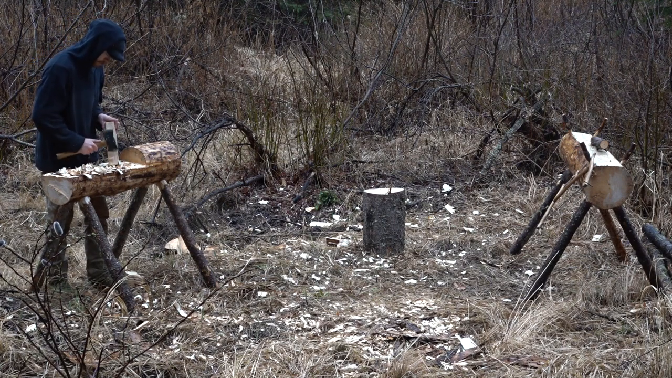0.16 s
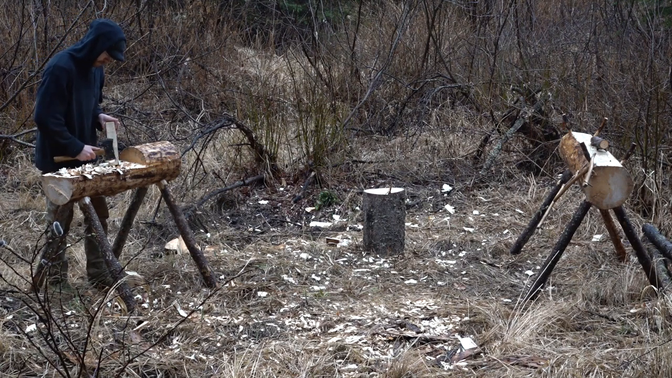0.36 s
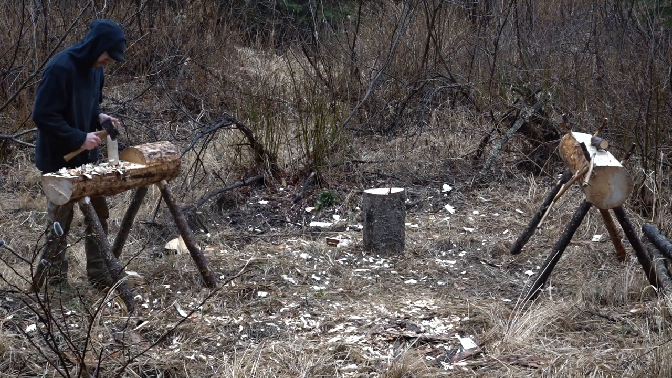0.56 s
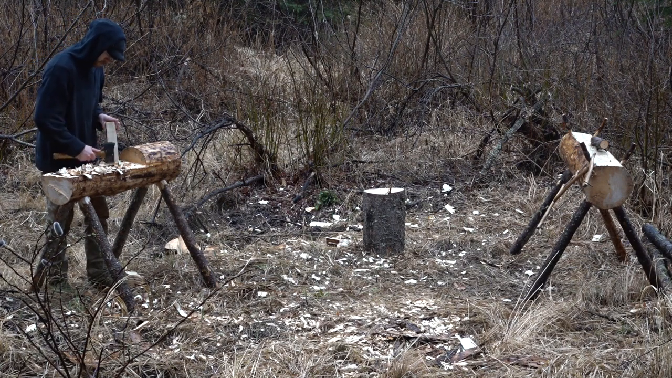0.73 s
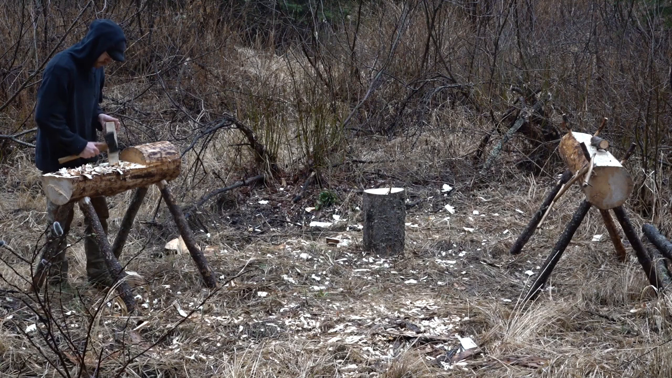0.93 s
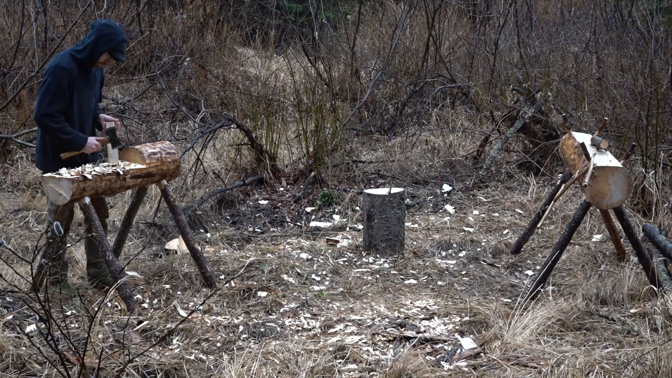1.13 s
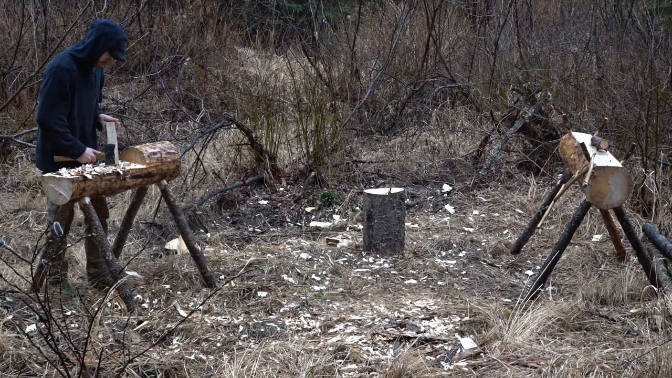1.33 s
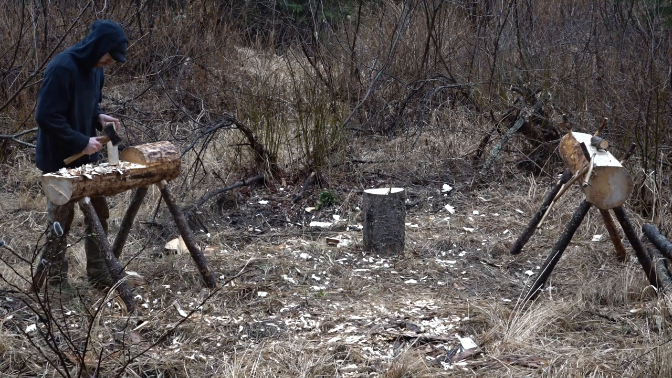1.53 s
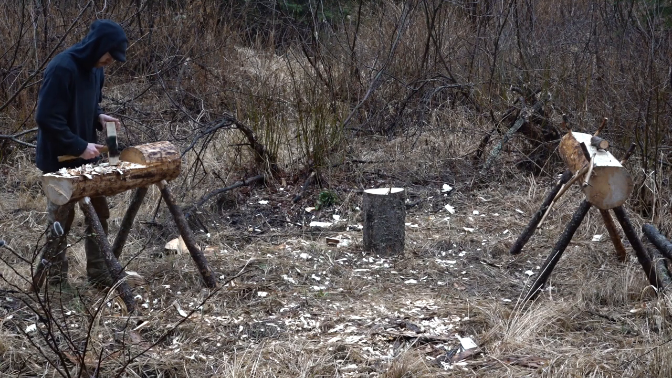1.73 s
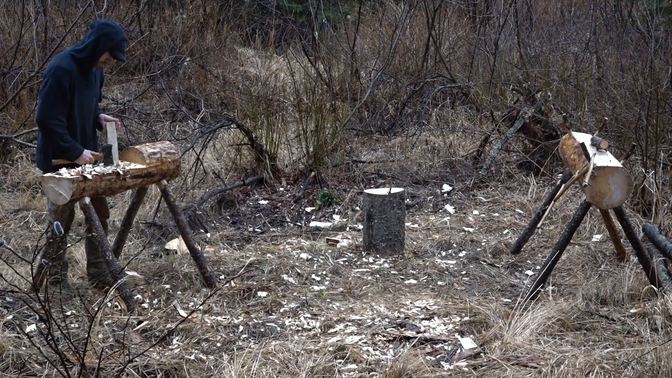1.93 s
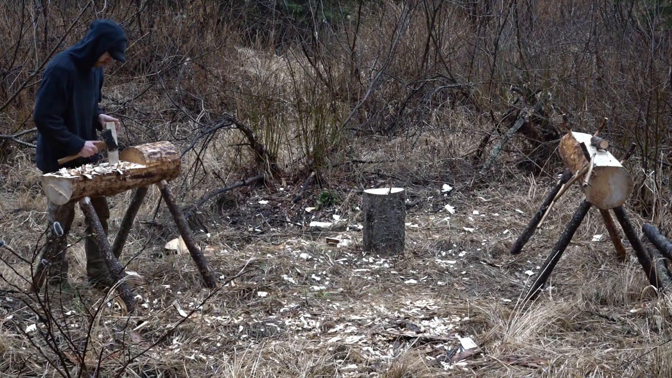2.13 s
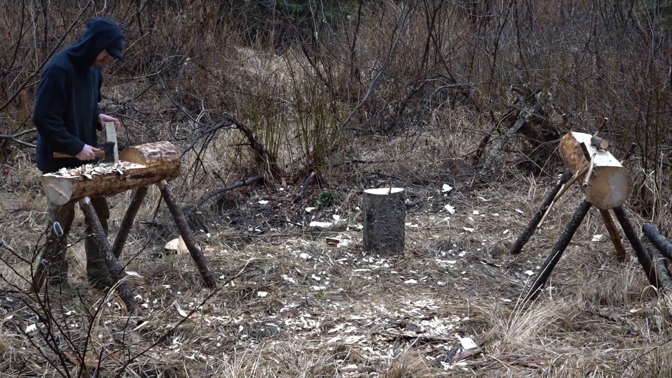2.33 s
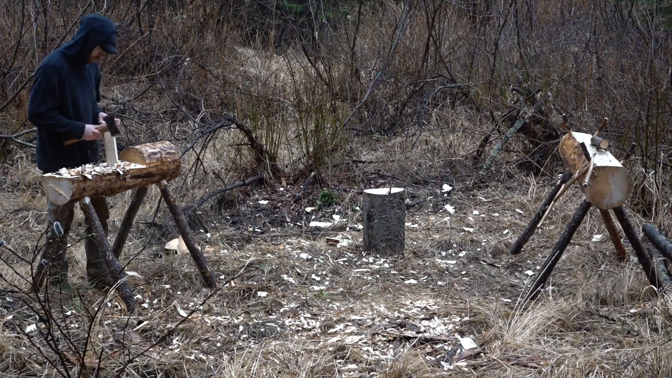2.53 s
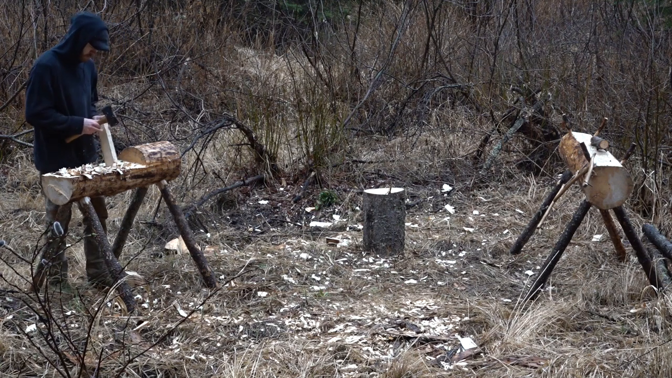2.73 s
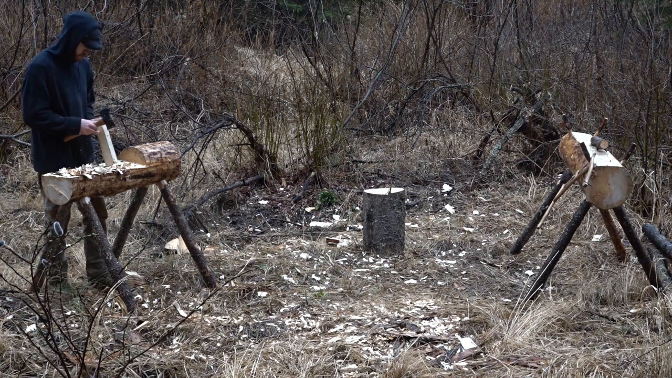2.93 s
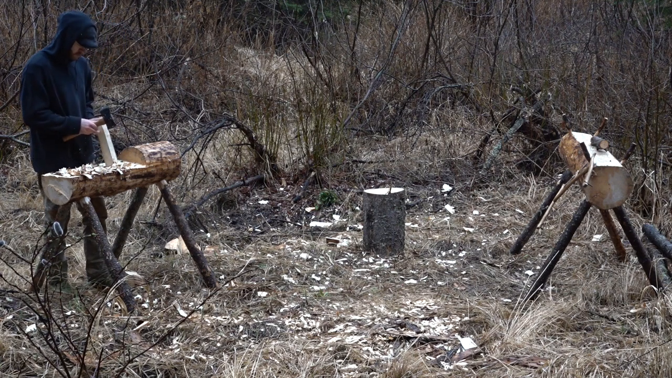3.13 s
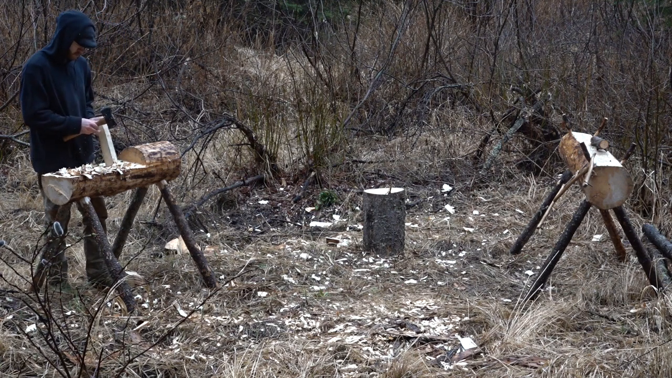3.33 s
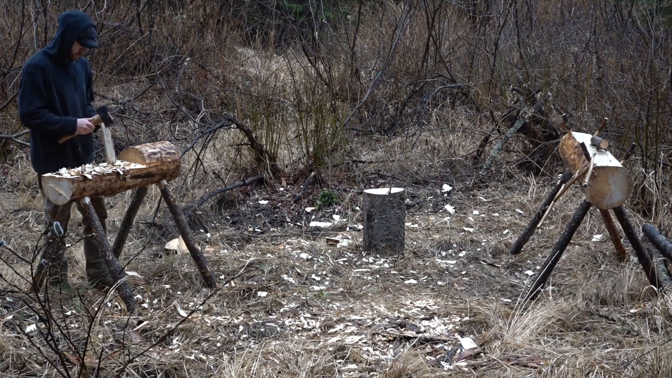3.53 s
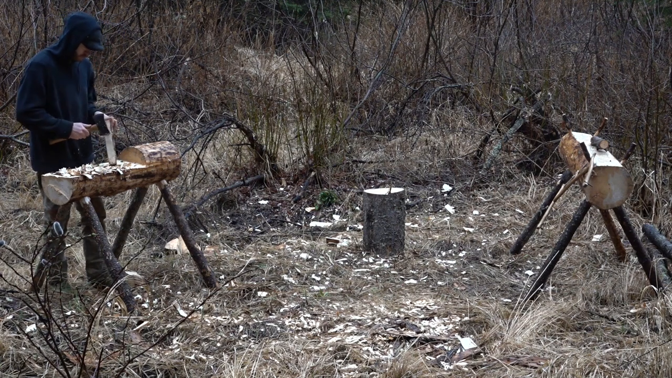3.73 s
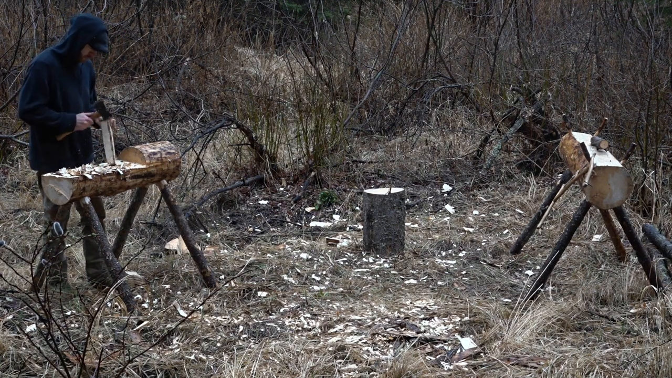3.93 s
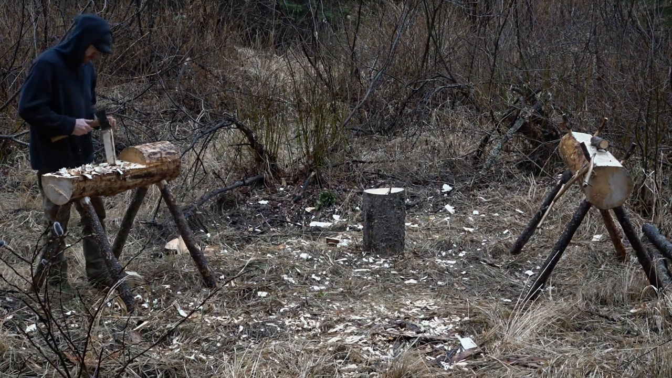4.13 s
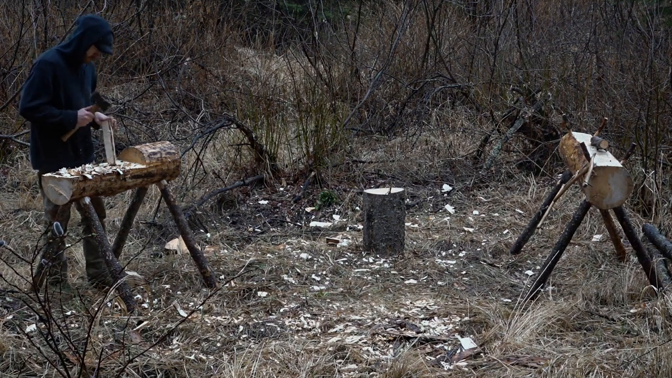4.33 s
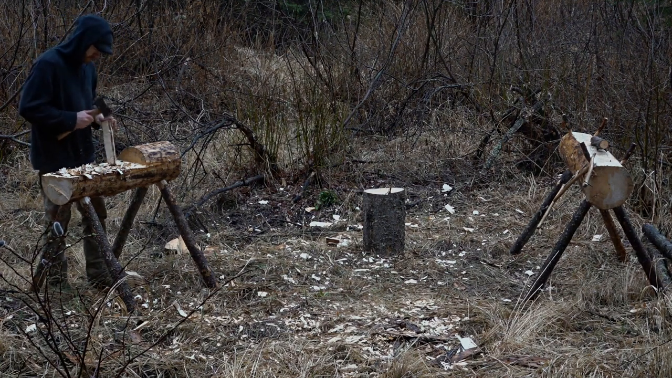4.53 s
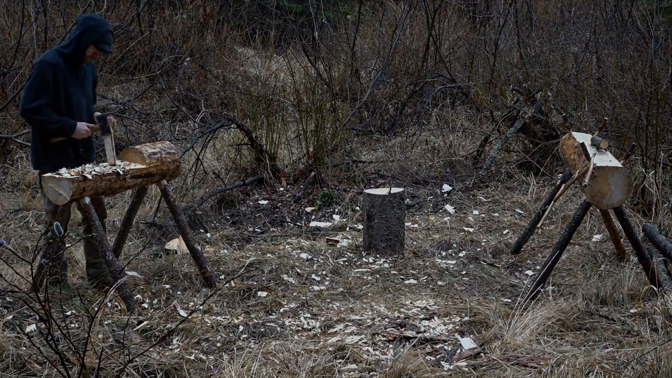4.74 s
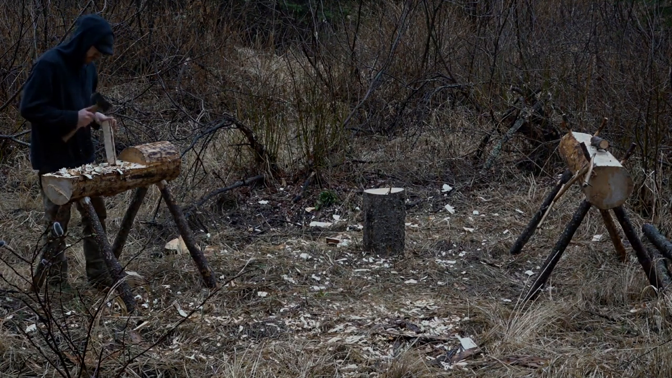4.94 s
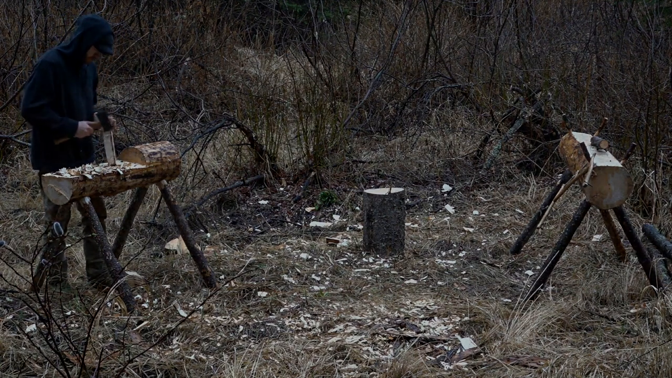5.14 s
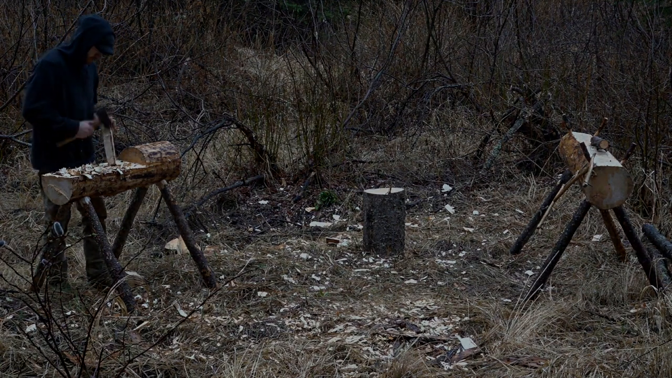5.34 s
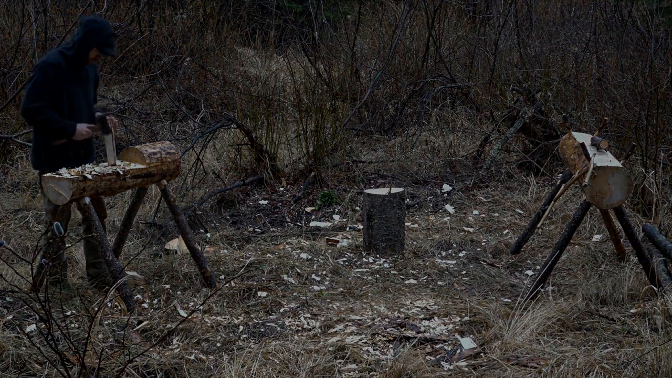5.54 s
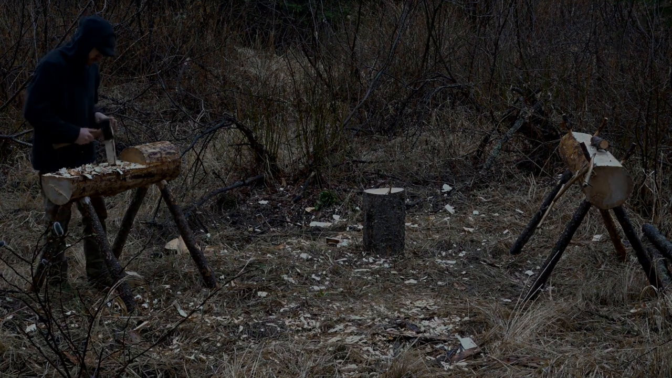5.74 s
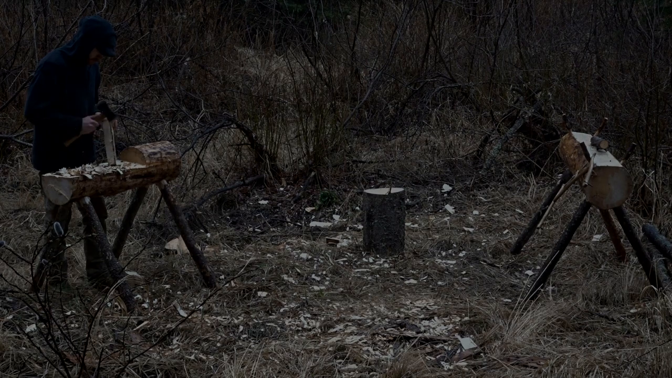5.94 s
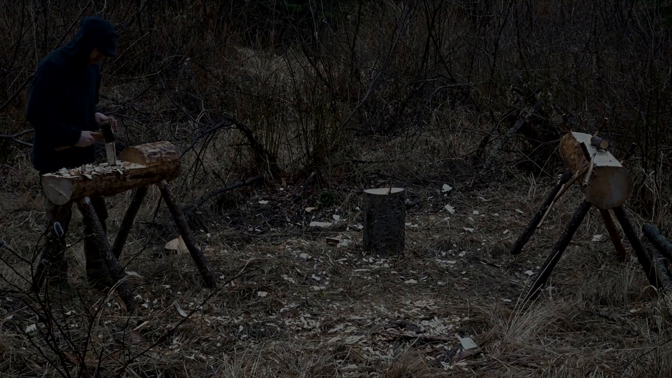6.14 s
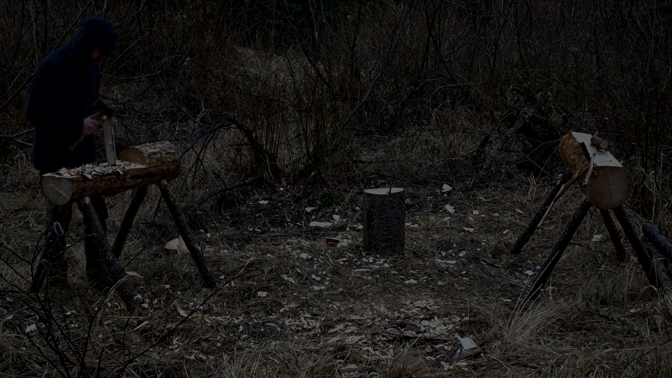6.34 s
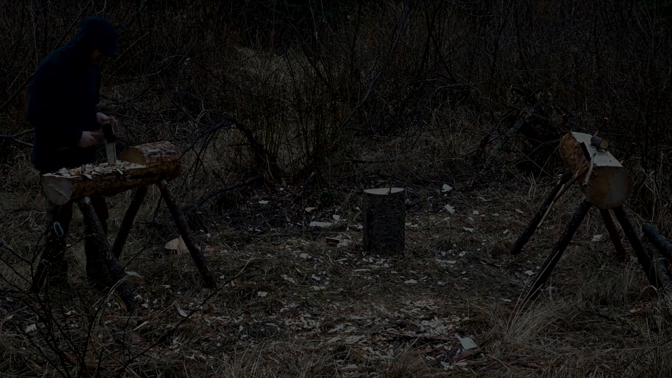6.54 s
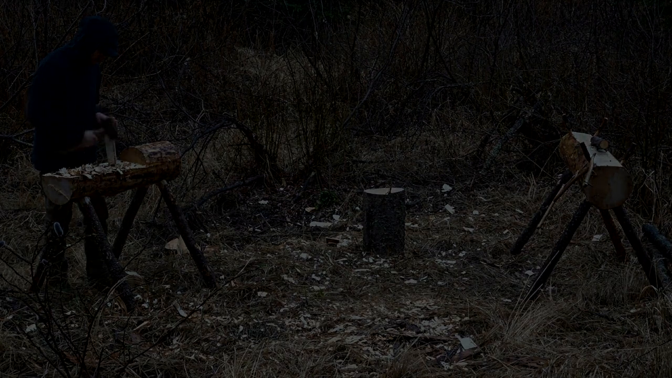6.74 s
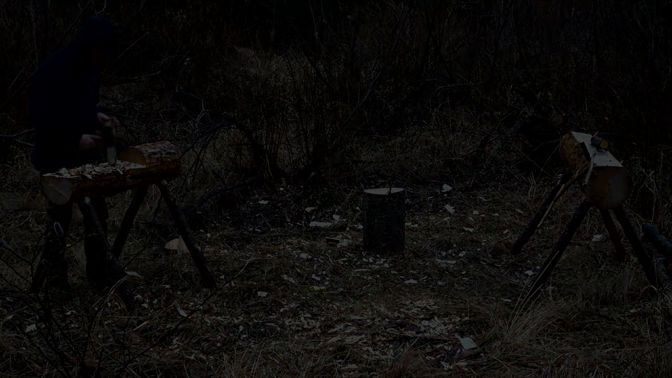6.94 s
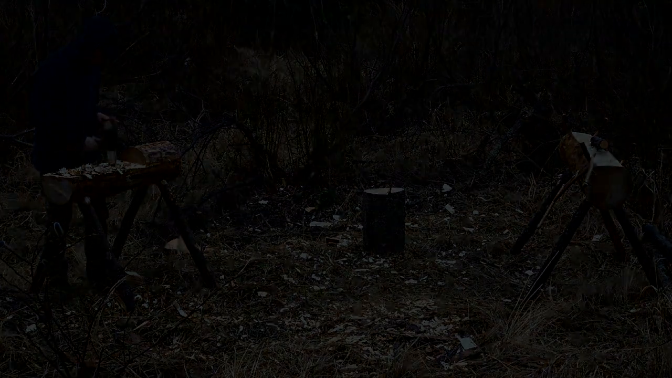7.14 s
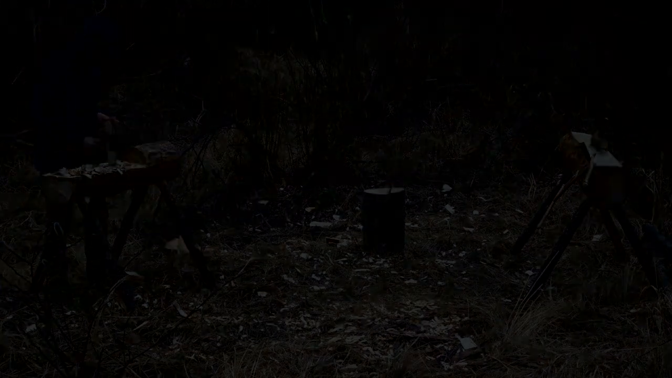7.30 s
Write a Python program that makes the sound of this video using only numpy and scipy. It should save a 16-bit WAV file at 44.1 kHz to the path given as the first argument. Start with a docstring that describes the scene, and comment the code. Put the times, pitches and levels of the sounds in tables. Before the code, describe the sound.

Outdoor stereo pickup from a few metres: steady hatchet blows on wood, just left of centre. Each is a short hard clack with crisp fibre splitting, a small metallic clink and the billet knocking hollowly on its bench. After the first run only tiny chip ticks and quiet air remain, then chopping returns lightly, strengthens, and sounds tighter and more metallic, with short scattered reflections from the brush.

```python
"""A soft hush of air in a forest clearing, then at once a hatchet, a few metres away on the left, hewing a billet
held upright on a log bench. Each chop is a short push that rings damped wood modes under a dry noise clack;
the steel head clinks, fibres tear in bursts of tiny snaps, the billet knocks on the bench and chips tick down.
After a pause the billet is turned and the head clinks more clearly. Brushwood scatters it all in diffuse echoes."""
import sys
import numpy as np
from scipy import signal
from scipy.fft import rfft, irfft, next_fast_len
from scipy.io import wavfile
from scipy.ndimage import map_coordinates

SR = 44100
rng = np.random.default_rng(int(sys.argv[2]) if len(sys.argv) > 2 else 0)


def unload_audio(sound):
    """Save the sound as a 16-bit wav file, at the path given as the first command line argument."""
    columns = np.transpose(np.atleast_2d(sound))
    # keep every value between -1 and 1, then stretch to whole-number steps
    steps = np.round(np.clip(columns, -1, 1) * 32767)
    wavfile.write(sys.argv[1], SR, steps.astype(np.int16))


N = 325017


def amp(db):
    """Decibels to linear gain."""
    return 10 ** (np.asarray(db) / 20)


def unit(x):
    """Scale to rms 1."""
    return x / np.sqrt(np.mean(x ** 2) + 1e-20)


def along(points, hz):
    """Read a curve of (hz, value) points on a log frequency axis."""
    point_hz, value = np.transpose(points)
    return np.interp(np.log(hz + 1), np.log(point_hz + 1), value)


def filtered(x, response):
    """Apply a response of frequency, with padding for its tail."""
    length = x.shape[-1]
    padded = next_fast_len(length + 4096)
    spectrum = rfft(x, padded) * response(np.fft.rfftfreq(padded, 1 / SR))
    return irfft(spectrum, padded)[..., :length]


def coloured(x, spectrum):
    """Shape a sound by a spectrum, at rms 1."""
    return unit(filtered(x, lambda hz: amp(along(spectrum, hz))))


def add(track, start_s, sound):
    """Mix a sound into a track at a time."""
    i = max(round(start_s * SR), 0)
    part = sound[..., :max(N - i, 0)]
    track[..., i:i + part.shape[-1]] += part


def age():
    """Seconds since a contact, over half a second."""
    return np.arange(SR // 2) / SR


def ringing(modes, pitch, length, scatter_db):
    """Damped modes, each struck at a slightly new strength every time."""
    hz, db, t60 = np.transpose(modes)[:, :, None]
    t = age()
    strength_db = db + scatter_db * rng.standard_normal(db.shape)
    decay = amp(strength_db - 60 * t / (t60 * length))
    return np.sum(decay * np.cos(2 * np.pi * hz * pitch * t), axis=0)


def contact(bandwidth_hz):
    """A bell-shaped force, its second derivative (the push on the air) and the time to its centre."""
    half = SR // 400
    u = (np.pi * bandwidth_hz * np.arange(-half, half + 1) / SR) ** 2
    force = np.exp(-u)
    push = (1 - 2 * u) * force
    return force, push, half / SR


# spectrum of the air in the clearing, relative: hz, density_db
HUSH_SPECTRUM = [(12, -15), (20, 2), (70, -3), (222, -12), (262, -13), (328, -13), (527, -12), (759, -14),
                 (825, -15), (897, -14.5), (1610, -22), (2990, -29), (3630, -30), (14700, -38.5),
                 (16000, -42)]
# how alike the hush is left and right: hz, likeness (1 = identical, 0 = unrelated)
HUSH_LIKENESS = [(60, 0.86), (150, 0.67), (380, 0.36), (950, 0.36), (2380, 0.22), (5980, 0.13),
                 (15000, 0.0092)]


def hush(level_db=-55.0, drift_db=-0.5):
    """Distant air in the trees and microphone hiss: wide coloured noise, drifting slowly in level."""
    # the mid-side angle sets how alike the two sides are
    angle = lambda hz: np.arccos(np.clip(along(HUSH_LIKENESS, hz), -1, 1)) / 2
    shape = lambda hz: amp(along(HUSH_SPECTRUM, hz)) * [np.cos(angle(hz)), np.sin(angle(hz))]
    mid, side = filtered(rng.standard_normal((2, N)), shape)
    drift = map_coordinates(rng.standard_normal(20), [np.arange(N) * 2 / SR])  # 2 points a second
    return amp(level_db + drift_db * drift) * unit(np.array([mid + side, mid - side]))


# a harder blow is a shorter, drier push:
# blow_peak_db, contact_bandwidth_hz, billet_ring_db (re the push), dense_ring_db
BLOW_FORCE = [(-39.5, 710, 29, -52.5), (-24.5, 1040, 5.5, -30), (-9, 1160, -3, -32.5),
              (-8.5, 1535, -10, -26.5)]


def by_force(db):
    """Contact bandwidth, billet ring and dense ring for a blow of this strength."""
    force_db, *columns = np.transpose(BLOW_FORCE)
    return [np.interp(db, force_db, column) for column in columns]


# the billet's modes under the blade: hz, level_db, t60_s
BILLET_MODES = [(622, -6, 0.018), (1020, 0.5, 0.014), (1260, -9.5, 0.06), (1857, -9.5, 0.095),
                (2360, -35, 0.035)]
# hatchet blows: start_s, peak_db (before the ground bounce), billet_pitch_ratio, steel_ring_db, steel_hz
HATCHET_BLOWS = [(0.156, -3.5, 0.95, -28, 2570), (0.461, -9.5, 1.09, -36.5, 2570),
                 (0.4662, -13.5, 1.5, -59, 2660), (0.7614, -12.5, 1, -35, 2580),
                 (1.065, -16.5, 0.99, -40, 2570), (1.3803, -8.5, 0.96, -33, 2880),
                 (1.706, -8.5, 0.96, -43, 2920), (2.0219, -14, 1.06, -34.5, 2730),
                 (2.3324, -18.5, 0.79, -55, 2700), (4.2091, -32, 0.8, -45, 2810),
                 (4.5025, -29, 0.82, -41.5, 2900), (4.8056, -25.5, 0.82, -40, 2850),
                 (5.1412, -24, 0.9, -31, 2840), (5.4615, -13.5, 0.86, -34.5, 2754),
                 (5.5118, -17, 1.1, -36.5, 2650), (5.8474, -15, 0.82, -34, 2754),
                 (6.176, -11, 0.89, -29, 2970), (6.5185, -7.5, 0.93, -31, 3040),
                 (6.5232, -14.5, 1.03, -45, 2880), (6.7756, -52, 0.81, -49, 2800),
                 (6.8748, -16.5, 0.84, -33, 2750), (6.9115, -26.5, 1.05, -55, 2900),
                 (7.253, -19, 0.74, -40, 2830)]


def chops(ground_s=0.001706, ground_db=-6.0, ground_hz=1900):
    """The edge stops in the wood: one sharp push, the billet's damped modes, and a dull bounce off the ground."""
    out = np.zeros(N)
    for start_s, peak_db, pitch, *_ in HATCHET_BLOWS:
        contact_hz, ring_db, _ = by_force(peak_db)
        force, push, lead_s = contact(contact_hz)
        modes = ringing(BILLET_MODES, pitch, 1, scatter_db=2)
        sound = np.convolve(modes, force / force.sum()) * amp(ring_db)
        sound[:len(push)] += push
        add(out, start_s - lead_s, -amp(peak_db) * sound / np.abs(sound).max())
    bounce = lambda hz: amp(ground_db) * np.exp(-(hz / ground_hz) ** 2 - 2j * np.pi * hz * ground_s)
    return filtered(out, lambda hz: 1 + bounce(hz))


def wood_damping(x, edge_hz):
    """Wood carries little above its highest strong mode: a steep low-pass."""
    lowpass = signal.butter(N=6, Wn=edge_hz, fs=SR, output="sos")
    return signal.sosfilt(lowpass, x)


# spectrum of the blurred wood modes, relative: hz, density_db
GRAIN_SPECTRUM = [(100, -27), (190, -14), (300, -39), (470, 11.5), (700, 2), (1200, -6.5), (1900, -9),
                  (2600, -17), (3100, -21), (6000, -36), (16000, -53)]


def wood_ring(t60=0.063, rise=0.00068):
    """The many higher modes of log and billet blur into a short dry clack of noise."""
    out, t = np.zeros(N), age()
    for start_s, peak_db, *_ in HATCHET_BLOWS:
        *_, wood_db = by_force(peak_db)
        blur = coloured(rng.standard_normal(len(t)), GRAIN_SPECTRUM)
        envelope = amp(wood_db - 60 * t / t60) * (1 - np.exp(-t / rise))
        add(out, start_s, envelope * blur)
    return out


OVERTONES_DB = -8.5  # offset of the overtone set from the lowest mode
# overtones of the head, before each clink's small detune and shortening: hz, level_db, t60_s
STEEL_OVERTONES = [(5380, -17.5, 0.091), (6655, -3.5, 0.032), (7000, -18, 0.028), (8060, -7, 0.056),
                   (9800, -12, 0.035)]


def steel(t60=0.026):
    """The head clinks: its lowest mode, pitched by how the wood grips it, and its faint overtones."""
    lowest, upper = np.zeros(N), np.zeros(N)
    for start_s, *_, steel_db, steel_hz in HATCHET_BLOWS:
        clink = ringing([(steel_hz, 0, t60)], 1, 1, scatter_db=1)
        add(lowest, start_s, amp(steel_db) * clink)
        detune = 1 + rng.normal(0, 0.012)
        overtones = ringing(STEEL_OVERTONES, detune, 0.8, scatter_db=2)
        add(upper, start_s, amp(steel_db + OVERTONES_DB) * overtones)
    return lowest, upper


# spectrum of tearing fibres and chip ticks, relative: hz, density_db
TEAR_SPECTRUM = [(300, -33), (1000, -9), (2500, 16.5), (4200, 2), (6800, 2), (9500, 1.5), (12000, 1.5),
                 (16000, -7)]


def crackle(length_s, centre_hz, snaps_per_s, width_octaves):
    """A burst of tiny snaps of uneven size, with rms 1 over its length; thinner fibres snap higher."""
    t = age()[:SR // 10]
    snaps = rng.standard_normal(len(t)) * ((rng.random(len(t)) < snaps_per_s / SR) + 0.32)
    # the torn wood rustles on briefly
    swell = np.exp(-(t / length_s) ** 4) + 0.11 * amp(-60 * t / 0.15)
    fibre = lambda hz: 0.6 + np.exp(-(np.log2((hz + 1) / centre_hz) / width_octaves) ** 2)
    return coloured(filtered(snaps * swell, fibre), TEAR_SPECTRUM) * np.sqrt(length_s * SR / len(t))


# the edge crushes a few fibres at every blow: level at a 0 dB blow, dB per dB of blow, length, emphasis
BITE_DB, BITE_GROWS, BITE_S, BITE_HZ = -38, 0.69, 0.0026, 6400
# a chip splits away ahead of the edge: start_s, rms_db, length_s, emphasis_hz
CHIP_SPLITS = [(0.466, -47.5, 0.0026, 6130), (0.767, -41, 0.0061, 5500), (0.781, -45.5, .0037, 8100),
               (1.085, -45.5, 0.0027, 5950), (1.38, -42, 0.0037, 6460),         (4.5, -46.5, .011, 11800),
               (4.809, -48, 0.016, 12000), (5.146, -43, 0.0078, 7400), (5.467, -32, 0.0021, 7400),
                        (5.5123, -44.5, 0.0022, 6170), (6.174, -45, 0.0048, 10000),
               (6.523, -37, 0.0053, 9700), (6.533, -32.5, 0.0017, 4850), (7.253, -54, 0.021, 6700)]


def splits():
    """Fibres part as the blade wedges in: a few at every blow, many when a chip splits away."""
    out = np.zeros(N)
    bites = [(start_s, BITE_DB + BITE_GROWS * peak_db, BITE_S, BITE_HZ)
             for start_s, peak_db, *_ in HATCHET_BLOWS]
    for start_s, rms_db, length_s, centre_hz in bites + list(CHIP_SPLITS):
        burst = crackle(length_s, centre_hz, snaps_per_s=5800, width_octaves=0.55)
        add(out, start_s, amp(rms_db) * burst)
    return out


KNOCK_HZ, KNOCK_HARDENS = 2270, 0.14  # contact bandwidth at 0 dB; it grows as this power of the force
PRESSED_SHARPENS = 0.99  # pressed harder on the bench, the billet rings shorter and higher
EDGE_DB, EDGE_LENGTH = -5, 0.74  # the tap of the edge is weaker and shorter
REBOUND_S, REBOUND_DB = 0.056, -27  # the billet hops once and settles
# modes of billet and bench together, before each knock's pitch and length: hz, level_db, t60_s
BENCH_MODES = [(177, -24.5, 0.092), (287, -14, 0.045), (475, -10.5, 0.062), (537.5, 3, 0.08),
               (654, -2.5, 0.056), (756, -1.5, 0.05), (873, -6.5, .035), (1082, -7, 0.065),
               (1350, -13, .03), (1765, -6, 0.032), (2180, -3, 0.025)]
# billet knocking on the bench: flat_landing_s, peak_db, ring_length_ratio, rocking_s (on its edge, before landing)
BENCH_KNOCKS = [(0.164, -50, 0.83, 0.0016), (0.7864, -17, 1, 0.0093), (1.0891, -18, 0.98, 0.0064),
                (1.402, -24.5, 0.92, 0.0022), (1.725, -16.5, 0.88, 0.0037), (2.0402, -24.5, 0.93, .0036),
                (2.342, -20.5, 1, 0.0039), (3.739, -47.5, 1, 0.0022), (4.84, -33.5, 0.65, 0.0024),
                (5.152, -33, 0.96, 0.0035), (5.484, -26, 0.52, 0.0025), (5.856, -41, 0.77, .002),
                (6.545, -33, 0.69, 0.0023), (6.898, -23.5, 0.495, 0.0017), (6.917, -33.5, 0.5, 0.00085),
                (7.279, -31.5, 0.59, 0.0016), (7.291, -31.5, 0.59, 0.0018)]


def knocks(rise=0.0001):
    """The billet is driven against the bench: it taps with an edge, lands flat with a hollow note and hops once."""
    out, t = np.zeros(N), age()
    for flat_s, flat_db, length, rock_s in BENCH_KNOCKS:
        pitch = 1 + PRESSED_SHARPENS * (1 - length) ** 2
        edge = (flat_s - rock_s, flat_db + EDGE_DB, length * EDGE_LENGTH)
        flat = (flat_s, flat_db, length)
        rebound = (flat_s + REBOUND_S, flat_db + REBOUND_DB, length * EDGE_LENGTH)
        for start_s, peak_db, ring in (edge, flat, rebound):
            force, _, lead_s = contact(KNOCK_HZ * amp(peak_db) ** KNOCK_HARDENS)
            modes = ringing(BENCH_MODES, pitch, ring, scatter_db=1.5)
            sound = np.convolve(modes * (1 - np.exp(-t / rise)), force)
            add(out, start_s - lead_s, amp(peak_db) * sound / np.abs(sound).max())
    return out


# fainter chips fall at random: count, then mean peak, its spread and the woody part in dB
STRAY_COUNT, STRAY_DB, STRAY_SPREAD_DB, STRAY_LOW_DB = 12, -55.5, 7.5, -14
# the clearest chips and splinters: start_s, nominal_peak_db, woody_part_db (re the tick)
CLEAR_CHIPS = [(0.501, -46, -4), (0.624, -50, -14), (1.8085, -42, -5), (2.626, -46, -4), (2.942, -43, -8),
               (4.4452, -42.5, -26), (4.8705, -42.5, -19), (6.576, -43, -14), (6.776, -41.5, 9),
               (7.0397, -46, -14)]


def chips(t60=0.0093, crest_db=5):
    """Loose chips snap off and land as short noise ticks; heavier ones have a woody part."""
    out, t = np.zeros(N), age()
    strays = [(rng.random() * N / SR, rng.normal(STRAY_DB, STRAY_SPREAD_DB), STRAY_LOW_DB)
              for _ in range(STRAY_COUNT)]
    for start_s, peak_db, low_db in list(CLEAR_CHIPS) + strays:
        tick = coloured(rng.standard_normal(len(t)), TEAR_SPECTRUM)
        body = coloured(rng.standard_normal(len(t)), GRAIN_SPECTRUM)
        decay = amp(peak_db - crest_db - 60 * t / t60)
        add(out, start_s, decay * (tick + amp(low_db) * body))
    return out


def from_left(x, pan_db, lag_us):
    """The nearer microphone hears it louder and a little earlier."""
    sides = np.array([[1], [-1]]) / 2
    return filtered(x, lambda hz: amp(pan_db * sides) * np.exp(2j * np.pi * hz * sides * lag_us / 10 ** 6))


# spectrum of the brushwood echo, relative: hz, density_db
BRUSH_SPECTRUM = [(100, -33), (400, -4.5), (900, -2), (2200, 4), (3500, 2), (8000, 4.5), (16000, -5.5)]


def scatter(x, t60, rise):
    """Twigs and trunks return a diffuse echo, different for each microphone and each chop."""
    out, t = np.zeros((2, N)), age()
    # a fresh echo tail takes over 10 ms before each blow
    cuts = [0] + [round((row[0] - 0.01) * SR) for row in HATCHET_BLOWS[1:]] + [N]
    envelope = amp(-60 * t / t60) * (1 - np.exp(-t / rise))
    for begin, end in zip(cuts, cuts[1:]):
        tail = coloured(rng.standard_normal((2, len(t))), BRUSH_SPECTRUM) * envelope
        mid, side = tail / np.linalg.norm(tail[0])
        pair = np.array([mid + 0.75 * side, mid - 0.7 * side])
        add(out, begin / SR, signal.fftconvolve(x[None, begin:end], pair, axes=1))
    return out


# how strongly the flat cheeks of the head face the brush; the grip changes in the pause: time_s, level_db
CHEEK_FACING = [(2.5, 3), (4.0, 1)]


def scene():
    """The chopping on the left, its near and far echoes, and the hush of the clearing."""
    wood = wood_damping(chops(), edge_hz=2470) + wood_ring() + knocks()
    clink, overtones = steel()
    bright = splits() + chips() + clink + overtones
    direct = from_left(wood, pan_db=2.0, lag_us=11) + from_left(bright, pan_db=1.5, lag_us=13.8)
    # the cheeks radiate the head's lowest mode sideways, into the far brush
    facing_db = np.interp(np.arange(N) / SR, *np.transpose(CHEEK_FACING))
    sideways = amp(facing_db) * clink
    near = amp(-13.5) * scatter(wood + bright, t60=0.07, rise=0.0017)
    far = amp(-24.5) * scatter(wood + bright + sideways, t60=0.43, rise=0.016)
    return direct + near + far + hush()


TOP_HZ = 16150  # band limit


def record(dry):
    """The top end falls away very steeply at the band limit."""
    return filtered(dry, lambda hz: 1 / (1 + (hz / TOP_HZ) ** 120))


dry = scene()
out = record(dry)
unload_audio(out)
```